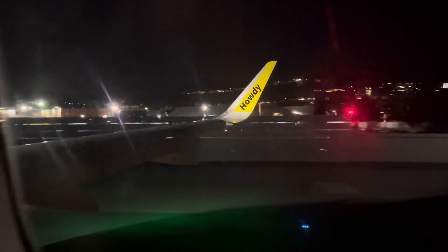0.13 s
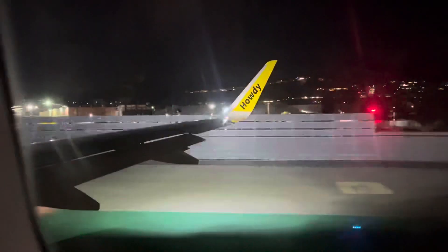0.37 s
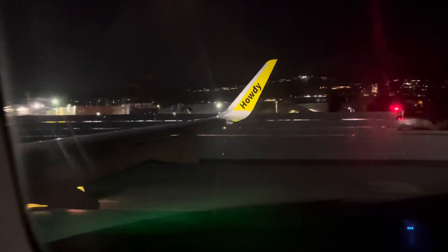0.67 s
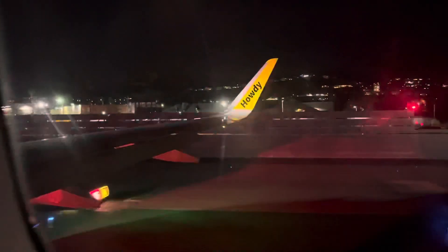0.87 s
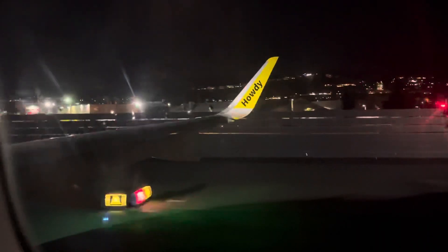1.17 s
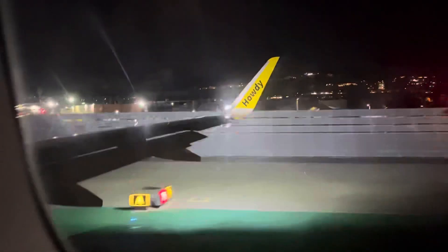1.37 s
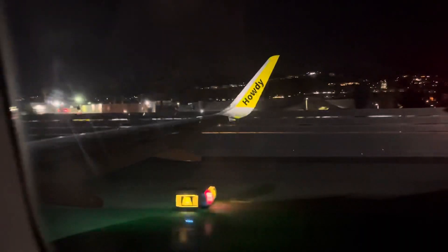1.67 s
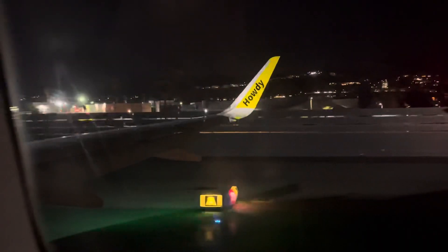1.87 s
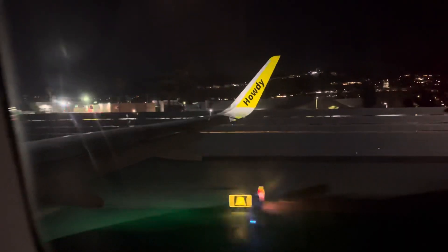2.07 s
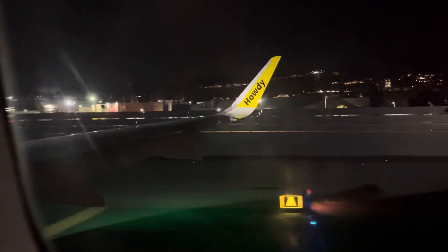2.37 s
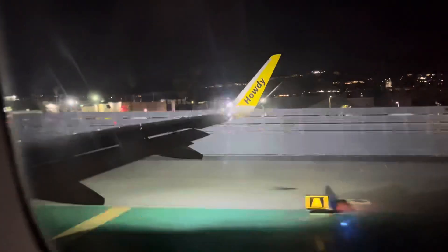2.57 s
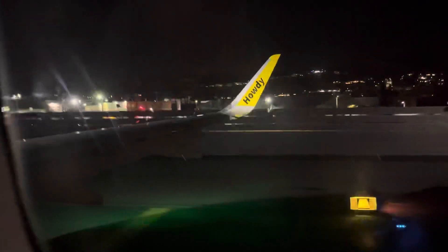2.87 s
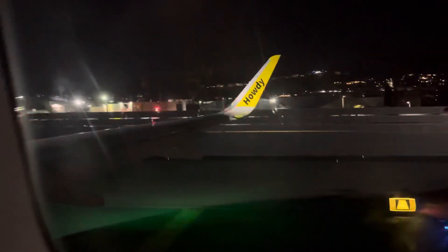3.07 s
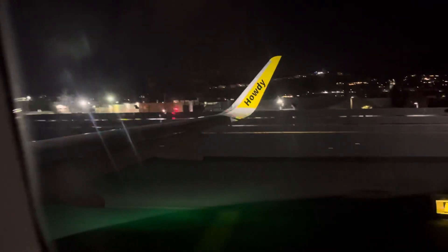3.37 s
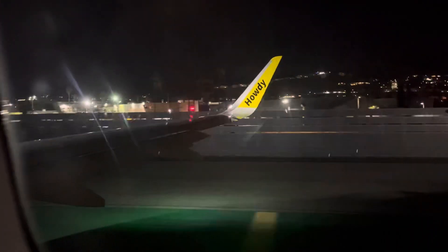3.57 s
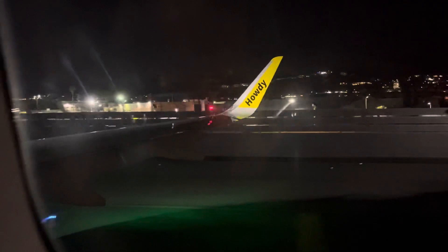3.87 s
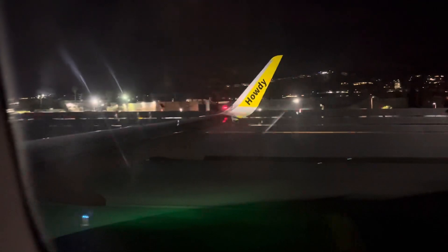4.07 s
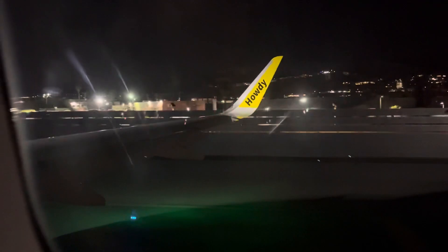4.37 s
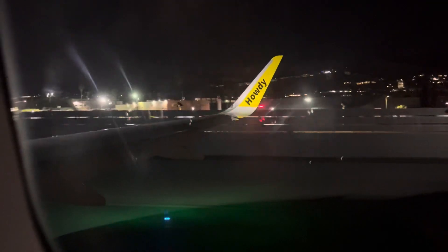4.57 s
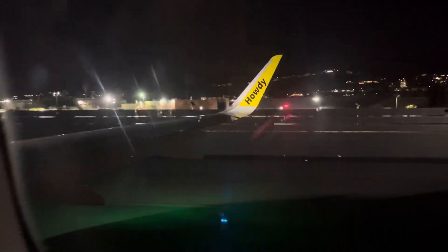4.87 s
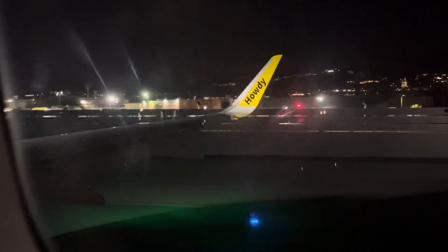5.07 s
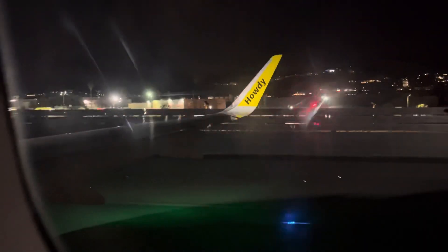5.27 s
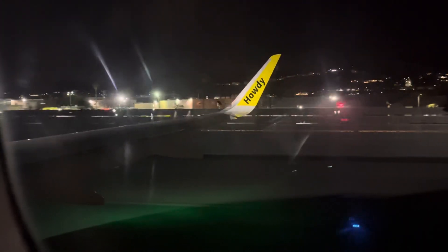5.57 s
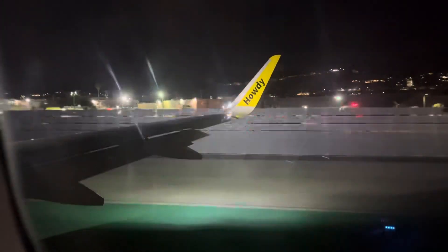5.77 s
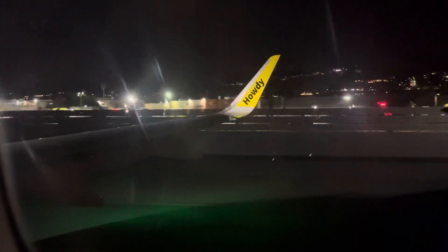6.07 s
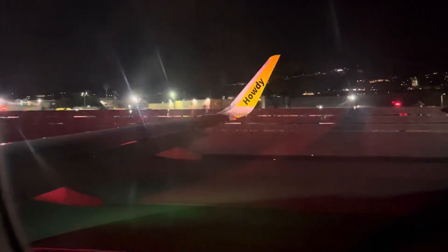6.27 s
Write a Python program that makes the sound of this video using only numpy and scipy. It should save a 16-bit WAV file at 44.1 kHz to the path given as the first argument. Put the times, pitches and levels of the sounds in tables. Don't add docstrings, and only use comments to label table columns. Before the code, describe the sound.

Inside a taxiing airliner cabin, a deep uneven fuselage boom rolls under jet rumble, soft vent hiss and a throbbing pump hum, with faint ticks and knocks.

```python
import sys
import numpy as np
from scipy import signal
from scipy.fft import rfft, irfft, next_fast_len
from scipy.io import wavfile
from scipy.ndimage import uniform_filter1d

SR = 44100
rng = np.random.default_rng(int(sys.argv[2]) if len(sys.argv) > 2 else 0)


def volts_from_decibels(level):
    exponent = np.asarray(level, float) / 20
    return 10 ** exponent


def pcm_store(signal):
    levels = np.round(np.clip(np.atleast_2d(signal), -1, 1) * 32767)
    wavfile.write(sys.argv[1], SR, levels.astype(np.int16).T)


N = 283116
SLOW = 64


def evened(x):
    return x / np.sqrt(np.mean(abs(x) ** 2) + 1e-20)


def read(points, hz):
    f, *columns = np.transpose(points)
    return [np.interp(np.log(hz + 1), np.log(f + 1), c) for c in columns]


def spread(slow):
    return np.interp(np.arange(N) / SLOW, np.arange(len(slow)), slow)


def drift(rate_hz):
    size = next_fast_len(N // SLOW + 2)
    fade = np.exp(-(np.fft.rfftfreq(size, SLOW / SR) / rate_hz) ** 2)
    return evened(spread(irfft(rfft(rng.standard_normal(size)) * fade, size)))


def swells(rows):
    s, db, length = np.transpose(rows)[:3, :, None]
    t = np.arange(0, N, SLOW) / SR
    return volts_from_decibels(db) * 2 ** -(2 * (t - s) / length) ** 2


def field(shape_db, size, patchy_db):
    # frequency in Hz, likeness 0-1, radians left leads, left over right in dB.
    ports = [(60, 0.99, 0.1, 0.5), (119, 0.95, -0.38, 0.5), (180, .98, -0.66, 0), (246, 0.92, 0.3, 0),
             (370, 0.73, 0, 3.5), (465, 0.96, -0.7, 2), (523, .75, -0.27, 2), (580, 0.5, -0.6, -3),
             (648, 0.2, 1, -1.5), (860, 0.7, 2, 1.5), (1170, 0.6, 1, -0.5), (1587, 0.4, 4, -6),
             (1757, 0.98, 0.95, 5), (2700, 0.3, 0.07, 3), (4150, 0.4, 0.1, 7), (5200, 0.5, 0, 6.5),
             (7220, 1, -1.9, 1), (8290, 0.93, -3, 0)]
    port_gap_s = 0.000146
    # pitch in Hz, width in Hz,
    # lift in dB (below zero a dip).
    noise_bands = [(160, 27, 2.5), (200, 11, 1.5), (257, 40, 1), (363, 34, 3.5), (424, 15, -5), (507, 50, 2.5),
                   (577.4, 18, 4), (921, 65, 6.5), (1175, 90, 3), (1320, 67, -1), (2120, 66, -3.5),
                   (2527, 76, 5.5), (4540, 230, 2.5), (8200, 850, -3.5), (9660, 52, 9.5), (14300, 1200, -0.5)]
    frames, hz = 4 * N // size + 5, np.fft.rfftfreq(size, 1 / SR)
    a, b, c, d, patches = rng.standard_normal((frames, len(hz), 5)).T
    patches = uniform_filter1d(patches, size=24, axis=0)
    patches = evened(uniform_filter1d(patches, size=6, axis=1))

    same, lead, tilt_db = read(ports, hz)
    lead = lead - 2 * np.pi * port_gap_s * np.maximum(hz - ports[-1][0], 0)
    same = np.clip(same, 0, 1)[:, None]
    tilt = volts_from_decibels(tilt_db / 2)[:, None]
    left = a + 1j * b
    right = same * left + np.sqrt(1 - same ** 2) * (c + 1j * d)
    right = right * np.exp(-1j * lead)[:, None]
    z = np.array([left * tilt, right / tilt])

    rings_db = sum(db / (1 + (2 * (hz - f) / width) ** 2) for f, width, db in noise_bands)
    standing_db = uniform_filter1d(rng.standard_normal((2, len(hz), 1)), size=size // 512 + 1, axis=1)
    uneven = np.clip(hz / 600, 0, 1) ** 2 * np.clip(2 - hz / 4500, 0, 1)
    standing_db = 1.1 * evened(standing_db) * uneven[:, None]
    z *= volts_from_decibels((shape_db(hz) + rings_db)[:, None] + standing_db + patchy_db * patches)
    return evened(signal.istft(z, nperseg=size, noverlap=size - size // 4)[1][:, :N])


def cabin_mode(rows, rest_hz, rest_db, wobble_hz, flutter_db, rate_hz):
    surges, rest = swells(rows), volts_from_decibels(rest_db)
    size = rest + surges.sum(0)
    hz = (rest * rest_hz + np.array(rows)[:, -1] @ surges) / size
    turn = 2 * np.pi * np.cumsum(spread(hz) + wobble_hz * drift(rate_hz)) / SR
    tone = np.sqrt(2) * np.cos(turn) * spread(size) * volts_from_decibels(flutter_db * drift(rate_hz))
    return tone * volts_from_decibels([[.7], [-.8]])


def vents():
    # frequency in Hz, level in dB per Hz.
    hiss_colour = [(600, -1), (720, 1.5), (860, -7), (1300, -10.5), (1600, -9.5), (1750, -14),
                   (2200, -12.5), (2600, -19.5), (2850, -19), (4100, -22), (4700, -25.5), (5300, -29.5),
                   (8500, -34.5), (16000, -48)]
    # time in seconds, dB over the steady air, length in seconds.
    rustle = [(.49, -0.5, 0.021), (1.26, -5.5, 0.046), (1.3, -9.5, 0.49), (1.46, -3.5, 0.036),
              (1.84, -10, .08), (1.95, -2.5, 0.057), (2.55, -8.5, 0.43), (3.25, -5.5, 0.067),
              (3.59, -7.5, .15), (4.43, -2, 0.079), (4.55, -7, .3), (5.43, -3, 0.062), (6.37, -10.5, 0.061)]

    def duct(hz):
        below = np.log2(np.maximum(hiss_colour[0][0] / (hz + 1), 1))
        return read(hiss_colour, hz)[0] - 15.0 * below

    hiss = volts_from_decibels(-43.5 + 0.11 * drift(1.7)) * field(duct, size=1024, patchy_db=0.9)
    top = signal.sosfiltfilt(signal.butter(4, 9200 / SR * 2, "high", output="sos"), hiss)
    return hiss + top * spread(swells(rustle).sum(0))


def jet():
    # frequency in Hz, level in dB per Hz.
    rumble = [(14, -22), (22, -16.5), (30, -6), (42, 2.5), (65, 0), (92, 1.5), (125, -2), (175, -1.7),
              (215, -3.5), (295, -13), (370, -9.5), (440, -12), (545, -11.5), (605, -29)]

    def wall(hz):
        above = np.log2(np.maximum(hz / rumble[-1][0], 1))
        return read(rumble, hz)[0] - 45.0 * above

    return field(wall, size=4096, patchy_db=-1.0) * volts_from_decibels(-23.5 + 0.39 * drift(5.7))


def fan():
    # pitch in Hz, level in dB.
    blade_tones = [(229.0, -43)]
    hz, db = blade_tones[0]
    level = volts_from_decibels(db + 0.85 * drift(2.1))
    turn = 2 * np.pi * np.cumsum(hz + 0.25 * drift(1.0)) / SR
    return np.sqrt(2) * level * np.sin(turn) * volts_from_decibels([[2.5], [-3.]])


def ticks():
    # start in seconds, peak in dB, pitch in Hz.
    tick_rows = [
        (0.4802, -56.5, 10060),
        (1.2555, -60, 11880),
        (1.383, -65.5, 9140),
        (1.453, -59.5, 13300),
        (1.472, -60.5, 9150),
        (1.9586, -64.5, 9500),
        (3.2594, -61, 9130),
        (3.6, -61.5, 12320),
        (4.415, -62.5, 9590),
        (4.4285, -61.5, 11840),
    ]
    t, out = np.arange(900) / SR, np.zeros((2, N))
    shape = np.minimum(t / .0015, 1) * np.exp(-t / .004)
    for (s, db, hz), grit in zip(tick_rows, rng.standard_normal((len(tick_rows), len(t)))):
        crack = signal.lfilter(*signal.butter(3, 8500 / SR * 2, "high"), grit)
        tick = volts_from_decibels(db + 3.0) * shape * (.6 * np.sin(2 * np.pi * hz * t) + .5 * crack)
        at = round(s * SR)
        out[0, at:at + len(t)] += tick
        out[1, at + 4:at + 4 + len(t)] += tick
    return out


def knocks():
    # start in seconds, peak in dB, pitch in Hz.
    knock_rows = [
        (1.1995, -38, 2260),
        (1.5105, -38.5, 2267),
        (2.7516, -39, 1766),
        (3.5671, -42.5, 2022),
        (3.582, -40.5, 1580),
        (6.2407, -41, 1905),
    ]
    rise_s, fade_s, lower = .004, .008, .84
    t, out = np.arange(2600) / SR, np.zeros((2, N))
    shape = np.minimum(t / rise_s, 1) * np.exp(-np.maximum(t - rise_s, 0) / fade_s)
    for s, db, hz in knock_rows:
        ring = np.sin(2 * np.pi * hz * t) + 0.67 * np.sin(2 * np.pi * lower * hz * t)
        out[:, round(s * SR):][:, :len(t)] += volts_from_decibels(db - 7.5) * shape * ring * volts_from_decibels([[.6], [-.6]])
    return out


def fuselage_frames():
    # time in seconds, peak in dB, length in seconds, pitch in Hz.
    surges = [(0.129, -26, 0.03, 176.5), (0.525, -27, 0.11, 165.8), (0.998, -30.5, 0.041, 165),
              (1.381, -29.5, 0.06, 184.6), (1.563, -30.5, 0.021, 175.3), (1.747, -30, 0.041, 164.7),
              (1.966, -31, 0.034, 171), (2.351, -25.3, 0.048, 176.0), (2.823, -28, 0.084, 174.7),
              (3.052, -27.5, 0.044, 184.4), (3.442, -27.5, 0.032, 166.4), (3.578, -28.6, 0.057, 169.2),
              (3.721, -25.5, 0.046, 187), (4.005, -37.5, 0.033, 178.0), (4.672, -31, 0.042, 160.1),
              (4.962, -28.5, 0.027, 166.8), (5.224, -30.5, 0.065, 170.3), (5.494, -29.5, 0.039, 180.5),
              (5.955, -28.5, 0.036, 167.3), (6.34, -29, 0.032, 177.2)]
    return cabin_mode(surges, rest_hz=178., rest_db=-42, wobble_hz=8.8, flutter_db=2.0, rate_hz=18.)


def floor_panels():
    # time in seconds, peak in dB, length in seconds, pitch in Hz.
    surges = [(0.993, -28, 0.063, 126.1), (1.392, -29.5, 0.031, 106.6), (1.528, -24, 0.029, 110.5),
              (1.73, -29, 0.027, 112.7), (2.703, -32, 0.069, 114.4), (2.945, -27.5, 0.038, 108),
              (3.081, -23, 0.053, 119.4), (3.219, -30, 0.033, 123.7), (3.566, -23.5, 0.047, 116.5),
              (3.725, -28, 0.047, 120.7), (4.064, -30, 0.047, 106), (4.276, -33, 0.038, 119),
              (4.97, -29.5, 0.052, 112.4), (5.32, -26, 0.028, 111.8), (5.49, -32, 0.06, 115.7),
              (5.79, -25.5, 0.056, 108.5)]
    return cabin_mode(surges, rest_hz=110, rest_db=-44, wobble_hz=3.3, flutter_db=-2.0, rate_hz=15.)


def pumps():
    pump_hz = (364.79, 366.62)
    mixes = [(1, 0), (0, 1), (2, 0), (1, 1), (0, 2), (4, -1), (3, 0), (2, 1), (1, 2), (0, 3), (-1, 4),
             (4, 0), (3, 1), (2, 2), (1, 3), (0, 4), (6, -1), (5, 0), (4, 1), (3, 2), (1, 4), (7, -1),
             (5, 1), (4, 2)]
    # left in dB, right in dB.
    mix_db = [(-39.5, -42.5), (-34, -46.5), (-61.5, -73), (-71.5, -59.5), (-70.5, -60), (-66.5, -68.5),
              (-63.5, -66), (-67, -72), (-64.5, -78.5), (-63.5, -65), (-73, -76), (-68, -73.5),
              (-81.5, -71.5), (-77, -82.5), (-83, -67), (-71.5, -77.5), (-71.5, -80.5), (-73, -82.5),
              (-70, -77), (-71, -77), (-74, -86), (-72, -94), (-77, -78.5), (-79, -92.5)]
    # first throb left in seconds,
    # first throb right in seconds, radians left leads.
    in_step = [
        (0.38, 0.58, -0.4),
        (0.3, 0.25, 1.2),
        (.42, .42, 0.92),
        (0.44, .42, -0.063),
        (0.34, 0.14, 1.6),
        (0.44, 0.34, 0.2),
    ]
    smear = 0.3
    t, out = np.arange(N) / SR, np.zeros((2, N))
    first = 2 * np.pi * pump_hz[0] * t + 0.065 * drift(1.9)
    load_db = 1.7 * drift(33.0)
    path_db = [2.0 * drift(11.0) for _ in in_step]
    first = first + 0.38 * drift(9.0)
    for (m, n), db in zip(mixes, mix_db):
        *throb_s, lead = in_step[m + n - 1]
        beat = 2 * np.pi * (pump_hz[1] - pump_hz[0]) * (t - np.array(throb_s)[:, None])
        turn = (m + n) * first + n * beat - smear * n * (n - 1) + np.array([[lead], [0]])
        level = volts_from_decibels(np.array(db)[:, None] + load_db + path_db[m + n - 1])
        out += np.sqrt(2) * level * np.cos(turn)
    return out


def drum():
    # time in seconds, peak in dB, length in seconds, pitch in Hz.
    surges = [(0.561, -32, 0.053, 72.4), (0.824, -20.5, 0.039, 75.07), (1.316, -19.5, 0.11, 72.75),
              (1.415, -29, 0.04, 70.5), (1.473, -22.5, 0.045, 70.8), (1.544, -19, 0.055, 74.96),
              (1.707, -25.5, 0.045, 78.1), (2.098, -31.5, 0.091, 73.34), (2.415, -25.5, 0.035, 76.4),
              (3.127, -18.5, 0.1, 76.5), (3.384, -26, 0.031, 80.3), (4.174, -27, 0.048, 76.1),
              (4.624, -24.9, 0.062, 76.9), (4.861, -29, 0.059, 82.4), (5.426, -22.5, 0.12, 81.44),
              (6.087, -29, 0.26, 76)]
    return cabin_mode(surges, rest_hz=70, rest_db=-33.5, wobble_hz=3., flutter_db=3.0, rate_hz=13.2)


def boom():
    # time in seconds, peak in dB, length in seconds, pitch in Hz.
    surges = [(0.079, -19.5, 0.26, 54.18), (0.542, -16, 0.12, 55.83), (0.742, -20, 0.17, 51.26),
              (0.977, -18.5, 0.12, 52.48), (1.194, -19, 0.066, 60.16), (1.297, -11.5, 0.054, 53.86),
              (1.409, -13, 0.128, 55.54), (1.686, -13.5, 0.111, 55.1), (1.851, -21.5, 0.167, 53.34),
              (2.102, -16, 0.016, 54.35), (2.216, -21.5, 0.172, 54.02), (2.408, -22.5, 0.041, 54.9),
              (2.634, -19.5, 0.18, 53.06), (2.814, -14.5, 0.053, 52.4), (3.175, -16.5, 0.097, 54.4),
              (3.533, -17.5, 0.36, 54.42), (3.817, -22.5, 0.032, 55.3), (3.967, -21.5, 0.064, 52.04),
              (4.075, -18.5, 0.044, 56.2), (4.242, -16, 0.048, 52.1), (4.482, -16.5, 0.11, 54.63),
              (4.625, -18, 0.049, 55.05), (4.823, -21, 0.051, 53.9), (4.953, -24.5, 0.032, 52.6),
              (5.373, -22.5, 0.34, 54.92), (5.788, -22.5, 0.038, 53.9), (5.904, -17, 0.095, 57.2),
              (6.011, -18, 0.046, 57.6), (6.139, -21, 0.07, 55), (6.31, -24, 0.23, 60.6)]
    return cabin_mode(surges, rest_hz=55.5, rest_db=-29.5, wobble_hz=2.603, flutter_db=1.5, rate_hz=16.)


def scene():
    air = vents() + jet() + fan()
    trim = ticks() + knocks()
    structure = fuselage_frames() + floor_panels() + pumps()
    return air + trim + structure + drum() + boom()


def roll_off(x):
    return signal.sosfilt(signal.butter(12, 15710, fs=SR, output="sos"), x)


def record(dry):
    return roll_off(dry)


dry = scene()
out = record(dry)
pcm_store(out)
```